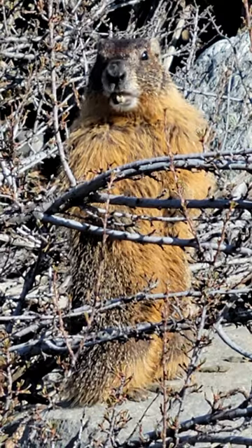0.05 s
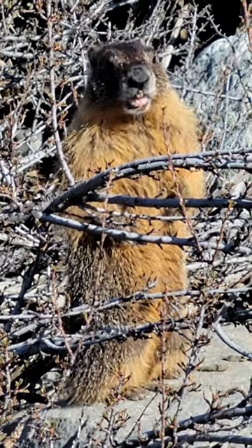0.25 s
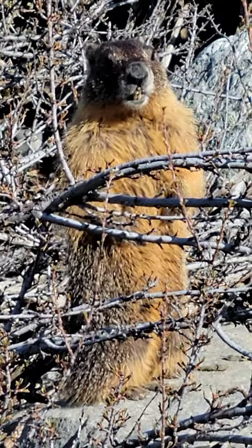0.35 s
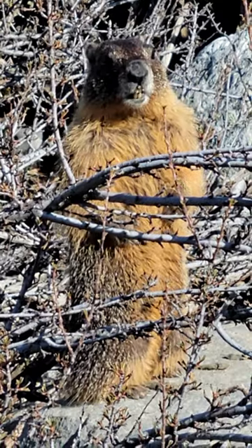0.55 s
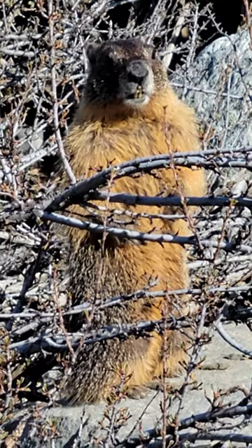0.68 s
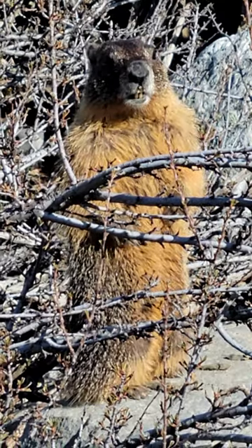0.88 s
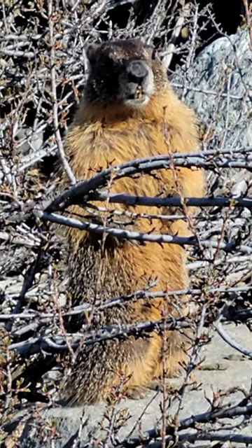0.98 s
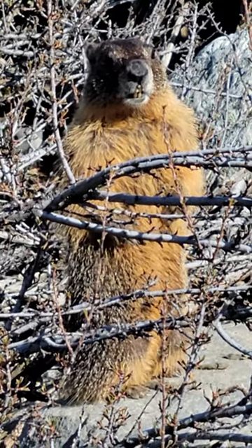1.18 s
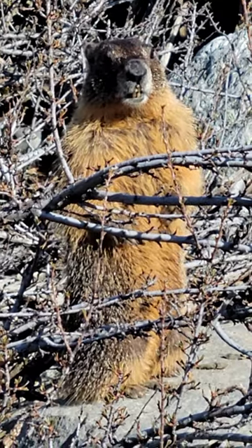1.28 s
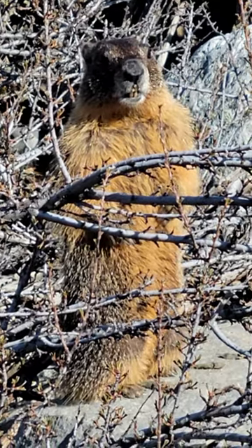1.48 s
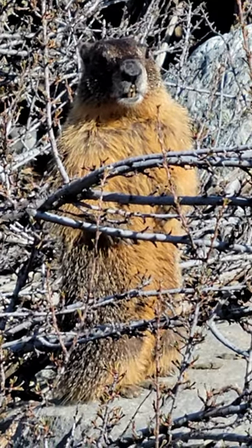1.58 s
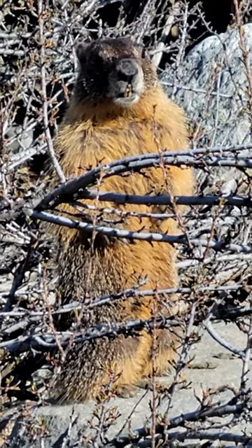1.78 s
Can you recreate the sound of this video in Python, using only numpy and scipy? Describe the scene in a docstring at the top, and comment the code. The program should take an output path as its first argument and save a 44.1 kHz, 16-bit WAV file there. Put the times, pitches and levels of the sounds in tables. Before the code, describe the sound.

A marmot gives one sharp, falling whistle outdoors over a faint low rush.

```python
"""A dull rush of distant wind or water, with a low rumble and a faint high rustle. Over it a marmot gives
one sharp alarm whistle that holds a high note, then plunges as the voice goes rough, its overtones
sweeping through the resonances of throat and mouth. Nearby rocks and brush scatter the call and far
slopes return a faint echo. A limiter ducks everything under the whistle. One tiny tick comes late."""
import sys
import numpy as np
from scipy import signal
from scipy.fft import rfft, irfft, next_fast_len
from scipy.io import wavfile
from scipy.ndimage import uniform_filter1d, minimum_filter1d, map_coordinates

SR = 44100
rng = np.random.default_rng(int(sys.argv[2]) if len(sys.argv) > 2 else 0)


def log_audio(samples):
    """Write samples as a 16-bit WAV file to the path given in sys.argv[1]."""
    # one column per channel
    frames = np.atleast_2d(samples).T
    # limit to full scale, then quantise
    limited = np.clip(frames, -1, 1)
    pcm = np.round(limited * 32767).astype(np.int16)
    wavfile.write(sys.argv[1], SR, pcm)


N = 81585


def amp(db):
    """Decibels to gain."""
    return 10 ** (np.asarray(db) / 20)


def unit_rms(x):
    """Scale to rms 1."""
    return x / np.sqrt(np.mean(x ** 2) + 1e-20)


def at_hz(table, hz):
    """Interpolate (freq_hz, value) rows on a log axis."""
    freq_hz, values = np.transpose(table)
    return np.interp(np.log(hz + 1), np.log(freq_hz + 1), values)


def curves(table):
    """One value per sample for each column after time_s."""
    time_s, *columns = np.transpose(table)
    return [np.interp(np.arange(N) / SR, time_s, column) for column in columns]


def wobble(knots_per_s):
    """Smooth random curve."""
    return map_coordinates(rng.standard_normal(N // 4), [np.arange(N) * knots_per_s / SR], mode="wrap")


def filtered(x, response):
    """Apply a complex response(hz)."""
    size = next_fast_len(N + SR // 2)
    return irfft(rfft(x, size) * response(np.fft.rfftfreq(size, 1 / SR)), size)[..., :N]


def coloured(x, table):
    """Minimum-phase filter from (freq_hz, gain_db) rows."""
    def response(hz):
        cepstrum = irfft(np.log(amp(at_hz(table, hz))))
        half = len(cepstrum) // 2
        return np.exp(rfft(np.r_[cepstrum[0], 2 * cepstrum[1:half]], 2 * half))
    return filtered(x, response)


def panned(x, table):
    """Pan by (freq_hz, left_minus_right_db) rows."""
    return filtered(x, lambda hz: amp(np.outer([.5, -.5], at_hz(table, hz))))


def reverberated(call, tail):
    """Convolve with a stereo tail scaled to energy 1 per channel."""
    tail = tail / np.linalg.norm(tail, axis=1, keepdims=True)
    return signal.fftconvolve(call[None], tail, axes=1)[:, :N]


# Left-right likeness of the air's noise: freq_hz, correlation
COHERENCE = [(60, 1), (130, .97), (290, .91), (950, 0.87), (1890, .72), (3770, 0.24), (7500, .05)]

def outdoor_noise(spectrum):
    """Stereo noise of rms 1, near mono in the bass."""
    def mid_side_gains(hz):
        angle = np.arccos(np.clip(at_hz(COHERENCE, hz), -1, 1)) / 2
        return amp(at_hz(spectrum, hz)) * [np.cos(angle), np.sin(angle)]
    mid, side = filtered(rng.standard_normal((2, N)), mid_side_gains)
    return unit_rms(np.array([mid + side, mid - side]))


# Rush spectrum: freq_hz, relative_density_db
RUSH_SPECTRUM = [(20, -22), (45, 1), (70, 8), (110, 0), (180, -1.5), (240, -8), (320, -3), (500, -4.5),
                 (620, -6.5), (800, -4), (1300, -11.5), (1650, -18.5), (2100, -31), (3000, -40),
                 (5000, -46.5), (8500, -56.5), (11000, -56), (13000, -49.5), (16000, -52)]
# Rush envelope: time_s, level_db
RUSH_ENVELOPE = [(0, -42.5), (.6, -44.5), (1.2, -42), (1.85, -42.5)]
# Balance of rush and rumble: freq_hz, left_minus_right_db
BACKGROUND_PAN = [(60, 2), (290, -.5), (640, -1.5), (1400, -.5), (3100, 6), (7000, 7.5)]

def rush():
    """Distant wind or water, dull and nearly steady."""
    level_db, = curves(RUSH_ENVELOPE)
    return amp(level_db + .5 * wobble(3.9)) * panned(outdoor_noise(RUSH_SPECTRUM), BACKGROUND_PAN)


# Rumble envelope: time_s, level_db
RUMBLE_ENVELOPE = [(0, -50), (.19, -46.5), (.3, -51.5), (.38, -41), (.52, -57), (.65, -45), (.77, -51.5),
                   (.92, -43), (1.1, -52), (1.19, -43), (1.28, -49), (1.38, -43.5), (1.6, -53.5),
                   (1.7, -44), (1.8, -56)]

def rumble(pitch_hz=81.7, wander_hz=5, swing_db=1.5):
    """One low note wavering in pitch and level."""
    level_db, = curves(RUMBLE_ENVELOPE)
    phase = 2 * np.pi * np.cumsum(pitch_hz + wander_hz * wobble(30)) / SR
    tone = unit_rms(np.sin(phase) * amp(swing_db * wobble(33)))
    return panned(amp(level_db) * tone, BACKGROUND_PAN)


# Rustle spectrum: freq_hz, relative_density_db
RUSTLE_SPECTRUM = [(1500, -25), (2300, -11), (2850, 1.5), (3600, -5), (5000, -15), (6000, -16.5),
                   (8000, -28), (15000, -36)]
# Rustle envelope: time_s, level_db
RUSTLE_ENVELOPE = [(0, -67.5), (.15, -77.5), (.88, -79.5), (1, -69), (1.1, -79.5), (1.4, -78), (1.5, -68),
                   (1.6, -75), (1.72, -68), (1.8, -65), (1.85, -66)]

def rustle():
    """Faint high noise that comes and goes."""
    level_db, = curves(RUSTLE_ENVELOPE)
    return amp(level_db + 1.2 * wobble(50)) * outdoor_noise(RUSTLE_SPECTRUM)


# Whistle contour: time_s, pitch_hz
WHISTLE_PITCH = [(.212, 3900), (.222, 3870), (.229, 3930), (.234, 3830), (.240, 3450), (.245, 3150),
                 (.249, 2830), (.252, 2520), (.2565, 1550), (.261, 1220)]
# Vocal effort: time_s, drive_db, roughness (0-1), overtones_db
WHISTLE_EFFORT = [(.190, -54, .1, -9), (.210, -37.5, 0.1, -7), (.2195, -15, 0.04, -4.5),
                  (.222, 2, 0.06, -1.5), (.232, 4, 0.2, 1.5), (.238, 3, 0.02, -8.5), (.245, 4.5, 0.1, -3),
                  (.251, -2, 0.3, 5), (.255, -11.5, .4, -2.5), (.260, -14.5, 0.1, -8),
                  (.264, -41.5, .3, -9)]
# Throat and mouth resonances: freq_hz, gain_db
VOCAL_TRACT = [(900, -11.5), (1430, -6.5), (2000, -19.5), (2600, -5.5), (3300, -1), (3950, -2),
               (4500, -3.5), (5400, 3), (6400, -5.5), (7200, -6), (7750, -3.5), (8400, -17.5),
               (10200, -15.5), (11700, -17.5), (13500, -38), (15600, -27)]
# Air rasp filter: freq_hz, gain_db
RASP_EQ = [(1200, -30), (2100, -20), (3000, -1), (4400, -6.5), (5600, 2.5), (7200, -2.5), (8400, -10.5),
           (9800, -6), (11000, -14), (12300, -9.5), (13500, -21), (15600, -19)]

def whistle(harmonics=6, tilt_db_per_octave=-5, rasp_db=-3.5):
    """The marmot's falling tone, shaped by its throat; roughness adds jitter, shimmer and a rasp of air."""
    flutter_per_s, flutter_depth, flutter_db = 300, .004, 2.2
    rough_per_s, jitter_depth, shimmer_depth = 2200, .19, .61
    t = np.arange(N) / SR
    pitch_hz, = curves(WHISTLE_PITCH)
    drive_db, roughness, overtones_db = curves(WHISTLE_EFFORT)
    flutter = flutter_depth * wobble(flutter_per_s)
    jitter = jitter_depth * roughness * wobble(rough_per_s)
    pitch_hz = pitch_hz * (1 + flutter + jitter)
    phase = 2 * np.pi * np.cumsum(pitch_hz) / SR
    overtones = sum(amp(tilt_db_per_octave * np.log2(k)) * np.sin(k * phase) * (k * pitch_hz < SR / 2)
                    for k in range(2, harmonics + 1))
    shimmer = shimmer_depth * roughness * wobble(rough_per_s)
    tone = (np.sin(phase) + amp(overtones_db) * overtones) * (1 + shimmer)
    rasp = amp(rasp_db) * roughness * (1 + np.cos(phase)) * rng.standard_normal(N)  # one puff per cycle
    sounding = (t > WHISTLE_EFFORT[0][0]) & (t < WHISTLE_EFFORT[-1][0])
    drive = np.sqrt(2) * amp(drive_db + flutter_db * wobble(flutter_per_s)) * sounding
    return coloured(drive * tone, VOCAL_TRACT) + coloured(drive * rasp, RASP_EQ)


# Rock reflections: left_delay_s, right_delay_s, gain_db
ROCK_REFLECTIONS = [(.0012, 0.0025, -11.5), (0.0111, .0098, -14.5)]
# Balance of the call: freq_hz, left_minus_right_db
CALL_PAN = [(1400, 0), (3000, -0.5), (3900, 2.5), (5500, -0.5), (7800, -12), (11700, -6.5), (15000, -2.5)]

def direct_and_rocks(call, left_lag_s=.00006):
    """The direct call, slightly later on the left, plus reflections off the nearest rocks."""
    def paths(hz):
        def delayed(*delays_s):
            return np.exp(-2j * np.pi * np.outer(delays_s, hz))
        reflections = sum(amp(db) * delayed(left_s, right_s) for left_s, right_s, db in ROCK_REFLECTIONS)
        return delayed(left_lag_s, 0) + reflections
    return panned(filtered(call, paths), CALL_PAN)


# Brush scatter filter: freq_hz, gain_db
BRUSH_EQ = [(1300, -2), (3300, -2), (5500, -1.5), (7800, -8), (9500, -2.5), (15000, -10.5)]

def brush_scatter(call, gain_db=-17.5, rise_s=.004, t60_s=.13):
    """Quick dense scatter from branches and boulders."""
    t = np.arange(SR // 2) / SR
    tail = rng.standard_normal((2, len(t))) * amp(-60 * t / t60_s) * (1 - np.exp(-t / rise_s))
    return amp(gain_db) * coloured(reverberated(call, tail), BRUSH_EQ)


# Far-slope echoes: delay_s, width_s, over_tail_db
SLOPE_ECHOES = [(.255, .03, 4.5), (.435, .028, 6.5)]
# Hillside decay: freq_hz, t60_s
SLOPE_DECAY = [(1500, 0.23), (3500, .72), (5500, .44), (8000, .42), (14000, .25)]
# Hillside filter: freq_hz, gain_db
SLOPE_EQ = [(1300, -6), (2600, -1), (3500, -6), (5500, -9), (7800, -13.5), (9300, -8.5), (14000, -10)]

def slope_echoes(call, gain_db=-34.5, rise_s=.03):
    """The hillside's long faint tail, losing treble and swelling with each far echo."""
    hz, t, spectrogram = signal.stft(rng.standard_normal((2, SR)), SR, nperseg=256)
    swell_db = sum(db * np.exp(-((t - delay_s) / width_s) ** 2) for delay_s, width_s, db in SLOPE_ECHOES)
    decay_db = -60 * t / at_hz(SLOPE_DECAY, hz)[:, None]
    envelope = amp(swell_db + decay_db) * (1 - np.exp(-t / rise_s))
    _, tail = signal.istft(spectrogram * envelope, SR, nperseg=256)
    return amp(gain_db) * coloured(reverberated(call, tail), SLOPE_EQ)


# Tick filter: freq_hz, gain_db
TICK_EQ = [(2500, -30), (4300, -18), (5500, 7.5), (7500, -3), (9500, -0.5), (11500, -15), (13500, -8),
           (16000, -14)]

def tick(start_s=1.6444, gain_db=-42, t60_s=.005):
    """One tiny dry burst of bright noise."""
    t = np.arange(N) / SR - start_s
    burst = rng.standard_normal((2, N)) * (t >= 0) * amp(-60 * np.abs(t) / t60_s)
    return amp(gain_db) * coloured(burst, TICK_EQ)


def scene():
    """The marmot on its hillside."""
    call = whistle()
    marmot = direct_and_rocks(call) + brush_scatter(call) + slope_echoes(call)
    return marmot + rush() + rumble() + rustle() + tick()


def record(dry):
    """Fast stereo-linked limiter, then a low-pass."""
    ceiling, lookahead_s, release_db_per_s = 1, .00076, 421
    stop_hz, taper_hz = 16000, 350
    window = int(lookahead_s * SR)
    needed_db = -20 * np.log10(np.maximum(np.abs(dry).max(axis=0) / ceiling, 1))
    held_db = minimum_filter1d(needed_db, 2 * window)
    recovery_db = release_db_per_s * np.arange(N) / SR
    gain_db = np.minimum.accumulate(held_db - recovery_db) + recovery_db
    limited = dry * amp(uniform_filter1d(gain_db, window))
    return filtered(limited, lambda hz: np.sin(np.pi / 2 * np.clip((stop_hz - hz) / taper_hz, 0, 1)) ** 2)


dry = scene()
out = record(dry)
log_audio(out)
```